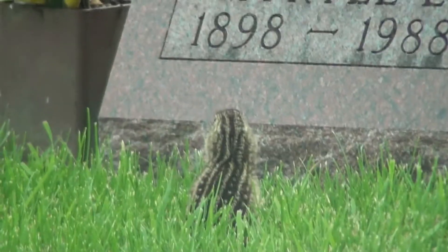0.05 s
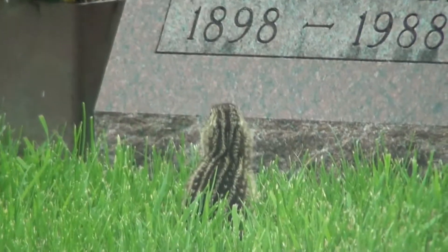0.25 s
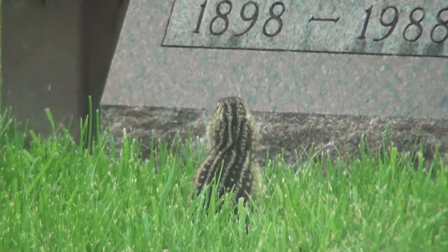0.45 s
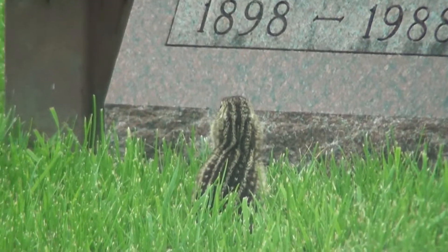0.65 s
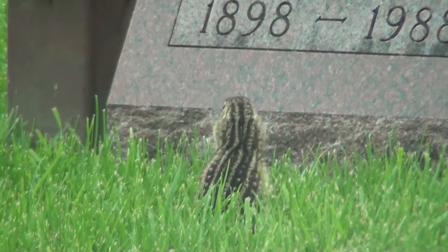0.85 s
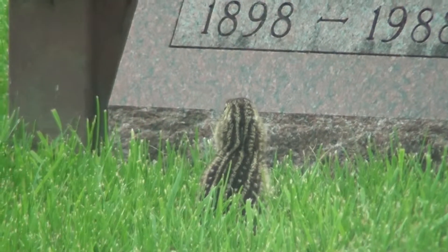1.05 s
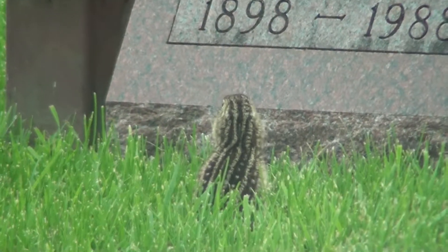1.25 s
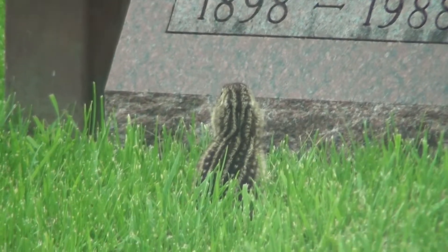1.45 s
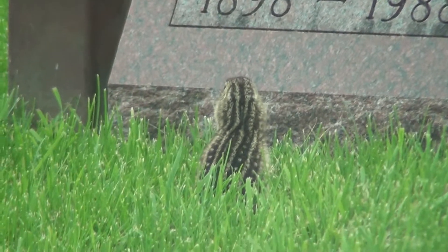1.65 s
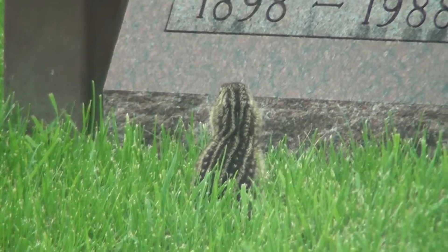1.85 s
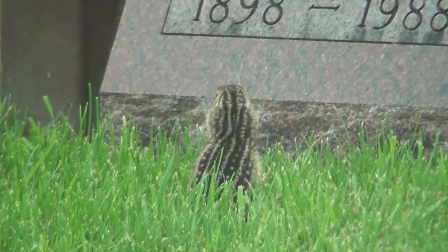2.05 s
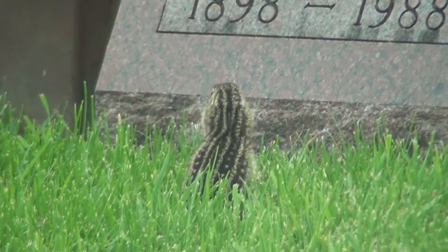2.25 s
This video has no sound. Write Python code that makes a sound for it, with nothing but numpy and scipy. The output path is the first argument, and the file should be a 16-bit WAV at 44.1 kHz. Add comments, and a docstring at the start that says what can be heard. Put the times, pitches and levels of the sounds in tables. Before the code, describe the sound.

A finger bumps a hand-held camera once, with faint ticks over quiet outdoor hiss.

```python
"""A finger bumps the case of a hand-held camera once: a knock, a scuff and a short ring.
Its plastic parts tick faintly and the grip rubs. An insect-like trill, probably the focus motor
stepping thirty times a second, pauses between the two clearest ticks. Behind them, on a quiet lawn,
distant traffic hums under the microphone's own hiss and a thin electronic whine."""
import sys
import numpy as np
from scipy import signal
from scipy.fft import rfft, irfft
from scipy.io import wavfile
from scipy.ndimage import uniform_filter1d

SR = 44100
rng = np.random.default_rng(int(sys.argv[2]) if len(sys.argv) > 2 else 0)


def put_to_file(sound):
    """Save the sound as 16-bit audio at rate SR, in the file named by the first command-line argument."""
    columns = np.atleast_2d(sound).T  # one column per channel
    safe = np.clip(columns, -1, 1)
    whole_steps = np.round(safe * 32767)
    wavfile.write(sys.argv[1], SR, whole_steps.astype(np.int16))


N = 105840

# Case modes (frequency [Hz], level [dB], t60 [s])
CASE_MODES = [(135.5, -26, 0.09), (176.7, -27.5, .07), (302, -32, 0.051), (419, -26.5, 0.033),
              (548, -33, 0.083), (658, -38, .085), (754, -30.5, 0.066), (883, -24.5, 0.045),
              (990, -27, .047), (1085, -25, 0.037), (1528, -49.5, 0.063), (1741, -35.5, 0.048),
              (2162, -43, 0.054), (2416, -45, 0.047)]
# Skin scuff spectrum (frequency [Hz], relative density [dB])
SCUFF_SPECTRUM = [(60, -8), (500, 5), (1300, 2), (2200, 5.5), (3000, -4.5), (4500, -13.5), (8000, -21),
                  (16000, -45)]


def finger_bump(t, start_s=0.2121, knock_hz=603, pan_db=2.4):
    """Damped knock and skin scuff; the case rings on, adjacent modes in opposite phase."""
    def place(x, hz):
        """Bass near centre, full left bias from 1 kHz up."""
        return pan(x, pan_db * min(hz / 1000, 1))

    age_s = t - start_s
    knock = place(undb(-14.8) * ring(age_s, knock_hz, rise_s=0.00087, t60_s=0.0144), knock_hz)
    case = np.zeros((2, N))
    for k, (hz, db, t60_s) in enumerate(CASE_MODES):
        mode = ring(age_s, hz, rise_s=0.125 / hz, t60_s=t60_s)
        case += (-1) ** k * undb(db - 0.3) * place(mode, hz)
    mid, side = noise(SCUFF_SPECTRUM), 0.53 * noise(SCUFF_SPECTRUM)
    skin = np.array([mid + side, mid - side])
    scuff = pan(undb(-32) * skin * strike_envelope(age_s, rise_s=0.0074, t60_s=0.049), pan_db)
    low_cut = signal.butter(N=2, Wn=88, btype="high", fs=SR, output="sos")
    return signal.sosfilt(low_cut, knock + case + scuff)


# Ticks (time [s], level [dB], tilt [dB/octave])
TICK_EVENTS = [(0.050, -58, -1), (0.082, -68, 1), (0.276, -57, 1), (0.297, -59, 0), (0.316, -54, -2),
               (0.4382, -38, -2.5), (0.7886, -42, -9), (0.8152, -53, -3.5), (0.8485, -52.5, -11),
               (1.065, -56, -1), (1.082, -53, -9), (1.249, -58, -4), (1.548, -49, -10), (1.749, -52, -7),
               (1.800, -50.5, -8), (1.818, -55, -5), (1.884, -54.5, -3), (2.018, -53, -13), (2.252, -60, 0),
               (2.315, -55, -7)]
# Plastic part modes (frequency [Hz], relative level [dB], t60 [s])
PLASTIC_MODES = [(4350, -7.5, 0.008), (4993, -1, .014), (6550, -2.5, 0.0088), (7000, -2, 0.0086),
                 (7890, 1.5, 0.0067), (9320, 0, 0.0096), (10200, -3.5, 0.01), (10890, 2, 0.0082)]


def plastic_ticks(t, scatter_count=40, scatter_db=-65.5, spread_db=4.5):
    """Two clear ticks and many faint ones, all ringing the same small part."""
    times_s = rng.uniform(0, t[-1], scatter_count)
    levels_db = rng.normal(scatter_db, spread_db, scatter_count)
    scatter = [(start_s, db, 0) for start_s, db in zip(times_s, levels_db)]
    lowest_hz = PLASTIC_MODES[0][0]
    out = np.zeros(N)
    for start_s, db, tilt_db_per_oct in list(TICK_EVENTS) + scatter:
        onset = int(start_s * SR)
        span = slice(onset, onset + SR // 20)
        for k, (hz, mode_db, t60_s) in enumerate(PLASTIC_MODES):
            gain = undb(db + mode_db + tilt_db_per_oct * np.log2(hz / lowest_hz))
            out[span] += (-1) ** k * gain * ring(t[span] - start_s, hz, rise_s=0.00008, t60_s=t60_s)
    return pan(out, db=2.3)


# Grip rubs (time [s], 1/e half width [s], level [dB])
RUB_EVENTS = [(0.202, 0.037, -61), (0.544, 0.044, -62.5), (1.47, 0.13, -71)]
# Rub spectrum (frequency [Hz], relative density [dB])
RUB_SPECTRUM = [(30, -20), (100, 3), (300, -1), (600, -7), (1500, -27), (8000, -46)]


def grip_rubs(t):
    """The hand slides on the case: brief swells of dull noise."""
    swells = sum(undb(db) * np.exp(-((t - peak_s) / half_s) ** 2) for peak_s, half_s, db in RUB_EVENTS)
    return noise(RUB_SPECTRUM) * swells


# Motor runs (start [s], end [s])
MOTOR_SPANS = [(0, 0.15), (0.165, 0.40), (0.83, 1.05), (1.135, 1.265), (1.30, 1.83), (1.865, 2.4)]
# Whistle pitch (time [s], frequency [Hz])
WHISTLE_PITCH = [(0, 7560), (0.06, 7620), (0.12, 7360), (0.22, 7650), (0.28, 7220), (0.36, 7680),
                 (0.98, 7400), (1.03, 7700), (1.18, 7360), (1.27, 7560), (1.49, 7270), (1.60, 7520),
                 (1.71, 7660), (1.82, 7285), (1.93, 7560), (2.05, 7500), (2.31, 7680), (2.4, 7480)]


def focus_motor(t, steps_per_s=29.97, step_s=0.014, glide_hz=119, jitter_s=0.0018, spread_hz=47):
    """Each step is a short, slightly rising whistle; pitch wanders between steps."""
    out = np.zeros(N)
    for start_s in np.arange(0.013, t[-1], 1 / steps_per_s):
        if any(on_s <= start_s < off_s for on_s, off_s in MOTOR_SPANS):
            age_s = t - rng.normal(start_s, jitter_s)
            active = (age_s > 0) & (age_s < step_s)
            progress = age_s[active] / step_s
            centre_hz = np.interp(start_s, *np.array(WHISTLE_PITCH).T) + rng.normal(0, spread_hz)
            hz = centre_hz + glide_hz * (progress - 0.5)
            whistle = np.sin(2 * np.pi * np.cumsum(hz) / SR)
            out[active] += undb(-62) * np.sin(np.pi * progress) * whistle
    return out


# Traffic and open-air spectrum (frequency [Hz], relative density [dB])
AIR_SPECTRUM = [(25, -43), (100, -12), (200, -3.5), (480, -0.5), (1000, -4.5), (1900, -5.5), (3200, -11.5),
                (5000, -16), (8000, -15), (12000, -34), (16000, -46)]
# Rumble spectrum (frequency [Hz], relative density [dB])
RUMBLE_SPECTRUM = [(20, -56), (42, -3), (60, -12.5), (80, 1), (115, 3.5), (160, -2.5), (250, -5),
                   (500, -12), (1500, -27)]


def traffic_and_air():
    """Diffuse distant traffic and air, uncorrelated left and right, over a wavering centred rumble."""
    swell_db = 0.22 * wander(rate_hz=2)
    air = [noise(AIR_SPECTRUM) * undb(-60.5 + swell_db + 0.5 * wander(rate_hz=14)) for _ in range(2)]
    rumble = noise(RUMBLE_SPECTRUM) * undb(-67.5 + wander(rate_hz=13))
    return np.array(air) + rumble


# Microphone hiss spectrum (frequency [Hz], relative density [dB])
HISS_SPECTRUM = [(100, -4.5), (1500, -5.5), (3000, 1), (4300, 1.5), (4900, 2), (5600, 0), (8000, 1),
                 (11000, 1), (13000, 0.8), (16000, -1)]


def electronics(t, whine_hz=8392, shimmer_hz=8690):
    """Microphone hiss, a steady whine and a narrow shimmering band just above it, all centred."""
    whine = undb(-80.5) * np.sin(2 * np.pi * whine_hz * t)
    shimmer = undb(-80) * unit_rms(wander(rate_hz=260) * np.sin(2 * np.pi * shimmer_hz * t))
    hiss = undb(-61.5) * noise(HISS_SPECTRUM)
    return hiss + whine + shimmer


def undb(db):
    """Decibels to gain."""
    return 10 ** (np.asarray(db) / 20)


def unit_rms(x):
    """Scale to rms 1."""
    return x / np.sqrt(np.mean(x ** 2))


def pan(x, db):
    """Stereo, left above right by db."""
    return x * undb(np.array([[db], [-db]]) / 2)


def noise(spectrum):
    """Noise of rms 1, shaped by (frequency [Hz], relative density [dB]) points."""
    hz, db = np.array(spectrum).T
    bins_hz = np.maximum(np.fft.rfftfreq(N, 1 / SR), 1)
    gain = undb(np.interp(np.log(bins_hz), np.log(hz), db))
    return unit_rms(irfft(rfft(rng.standard_normal(N)) * gain, N))


def wander(rate_hz):
    """Smoothed random sample-and-hold, rms 1."""
    hold = int(SR / rate_hz)
    steps = rng.standard_normal(N)[np.arange(N) // hold]
    return unit_rms(uniform_filter1d(uniform_filter1d(steps, hold), hold))


def strike_envelope(age_s, rise_s, t60_s):
    """Fast rise, exponential decay."""
    age_s = np.maximum(age_s, 0)
    return (1 - np.exp(-age_s / rise_s)) * np.exp(-np.log(1000) * age_s / t60_s)


def ring(age_s, hz, rise_s, t60_s):
    """One struck mode."""
    return strike_envelope(age_s, rise_s, t60_s) * np.sin(2 * np.pi * hz * age_s)


def scene():
    """The camera's own small sounds over a steady background."""
    t = np.arange(N) / SR
    background = traffic_and_air() + electronics(t)
    return finger_bump(t) + plastic_ticks(t) + grip_rubs(t) + focus_motor(t) + background


def record(dry, cutoff_hz=15800):
    """The camera's steep low-pass."""
    return signal.sosfilt(signal.ellip(12, 0.1, 70, cutoff_hz, fs=SR, output="sos"), dry)


dry = scene()
out = record(dry)
put_to_file(out)
```